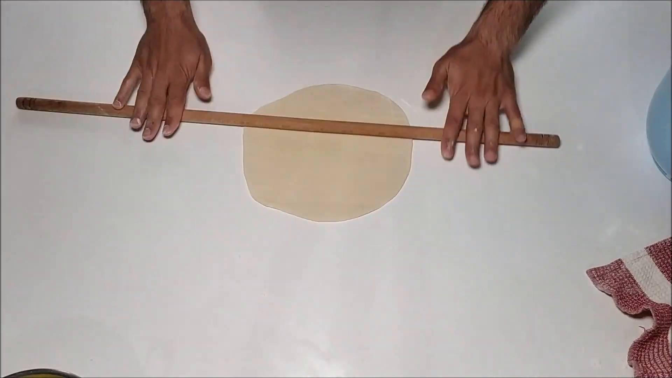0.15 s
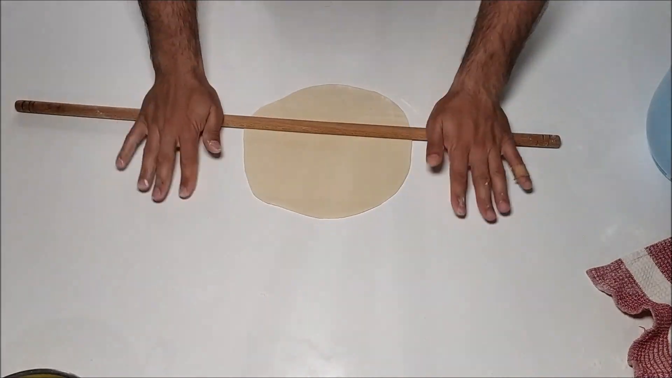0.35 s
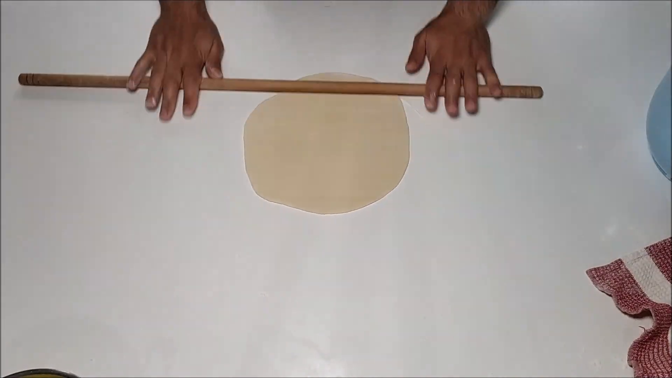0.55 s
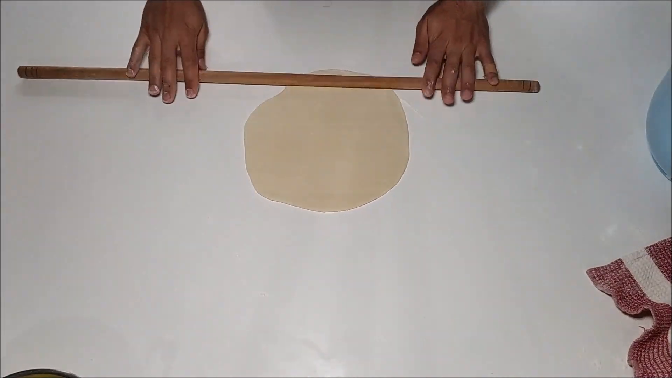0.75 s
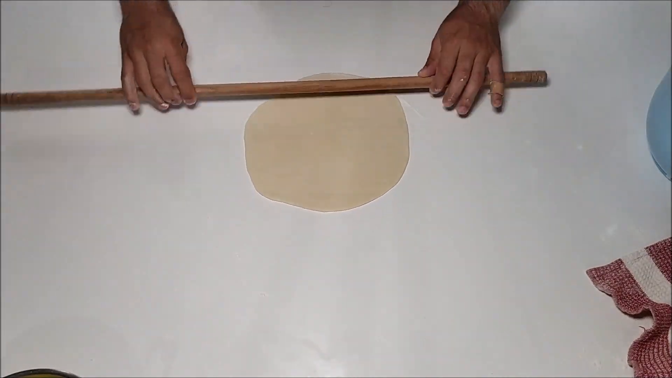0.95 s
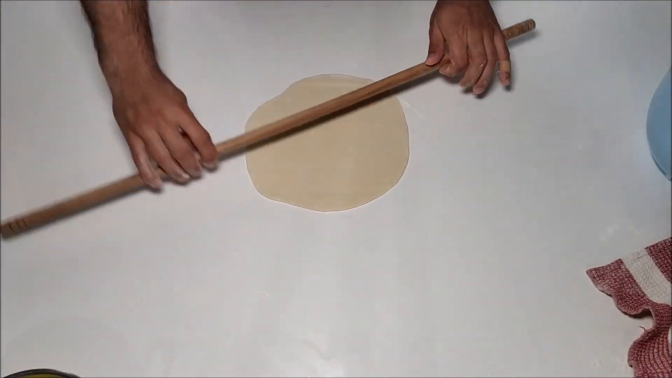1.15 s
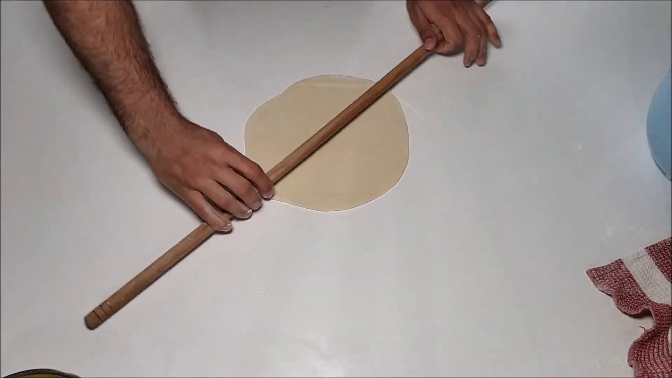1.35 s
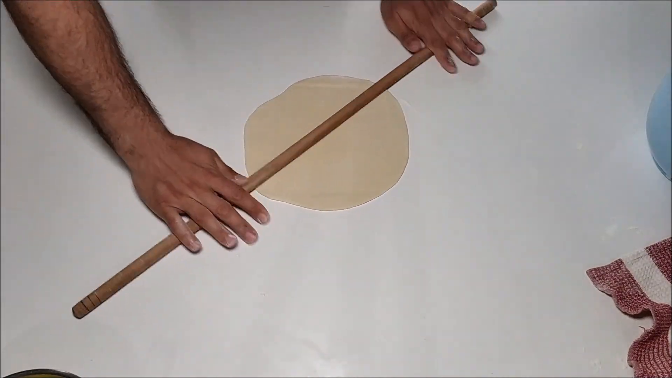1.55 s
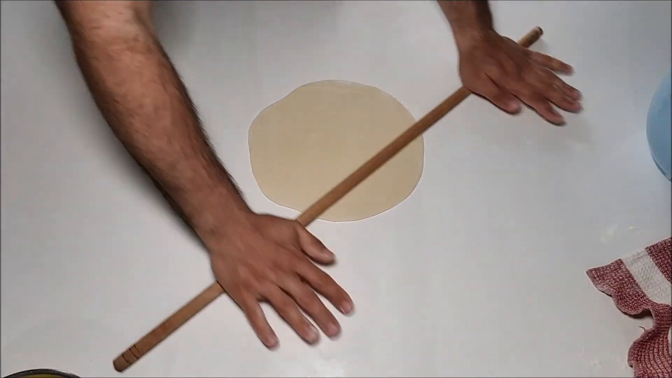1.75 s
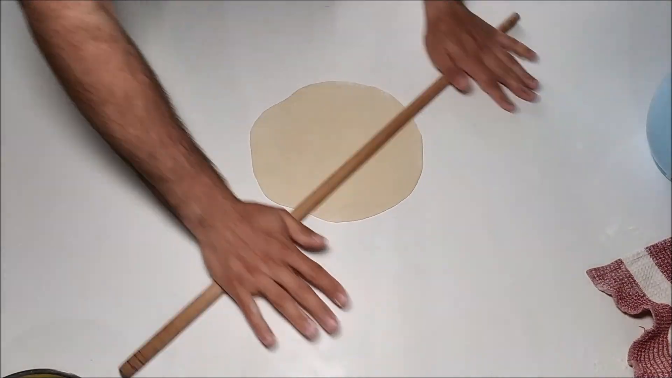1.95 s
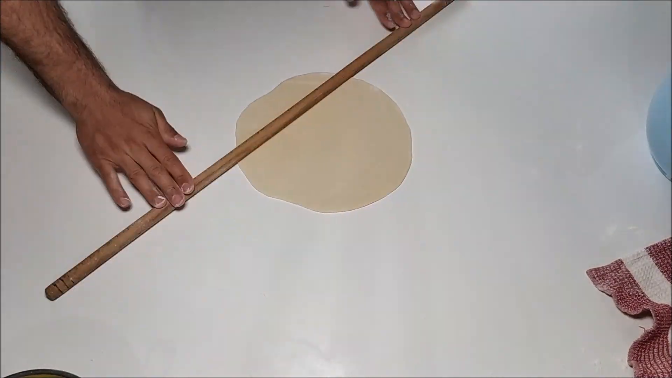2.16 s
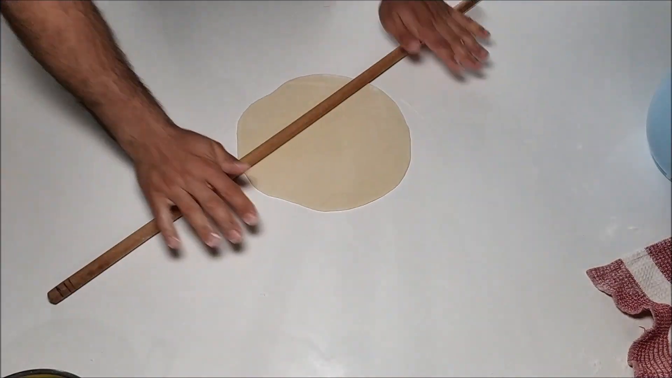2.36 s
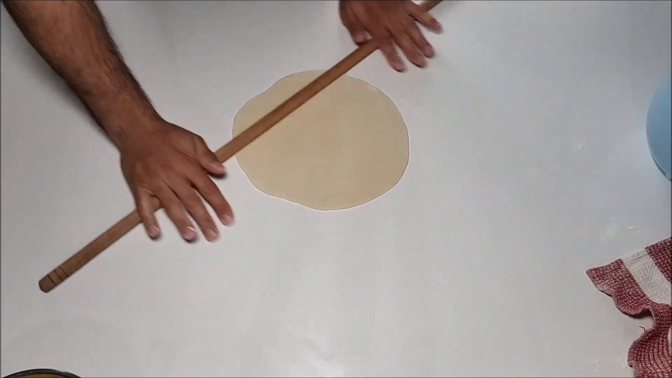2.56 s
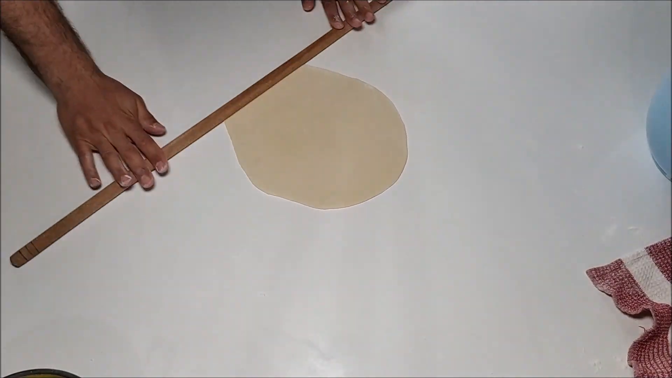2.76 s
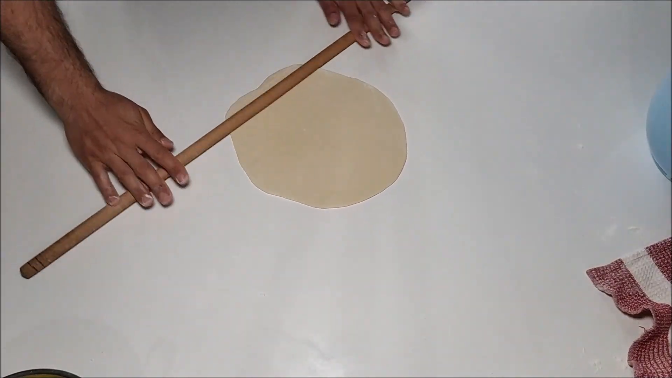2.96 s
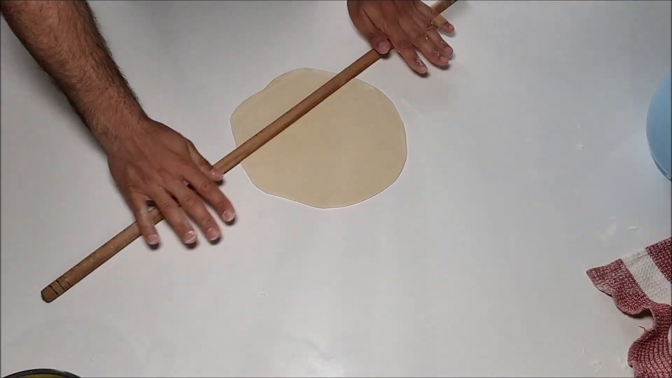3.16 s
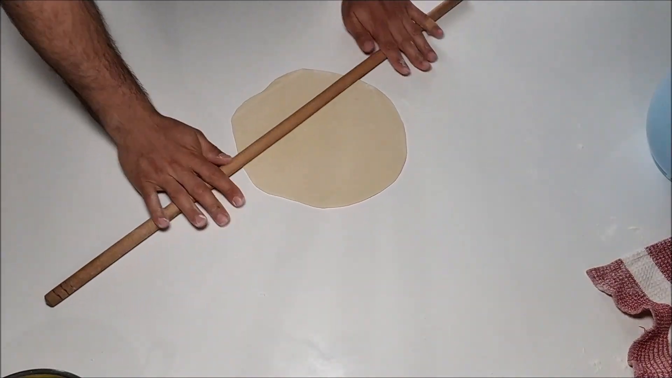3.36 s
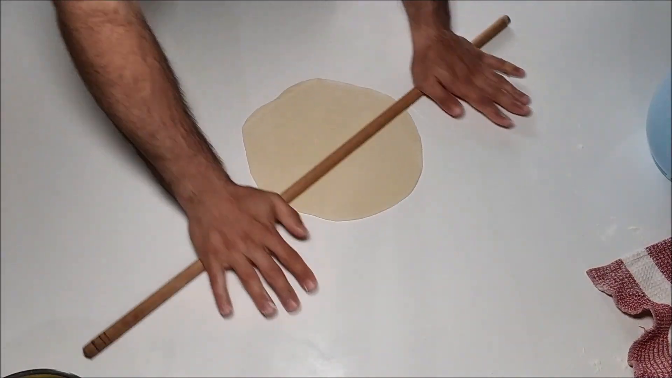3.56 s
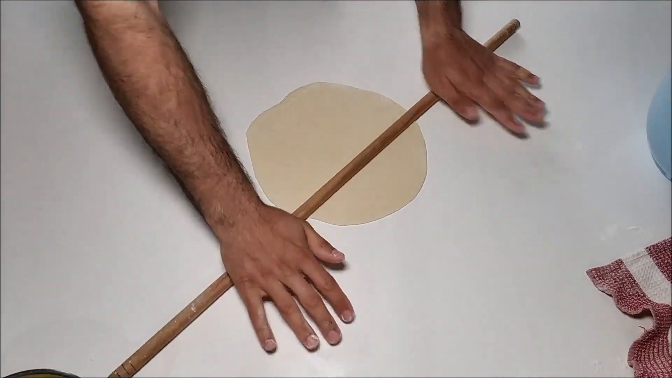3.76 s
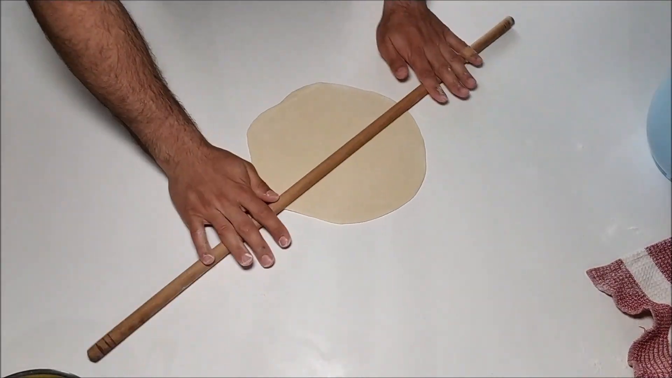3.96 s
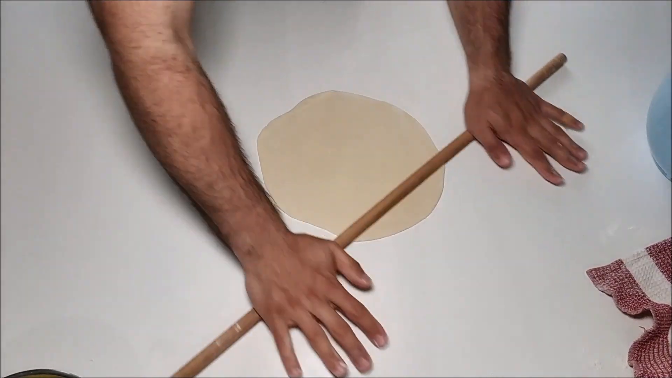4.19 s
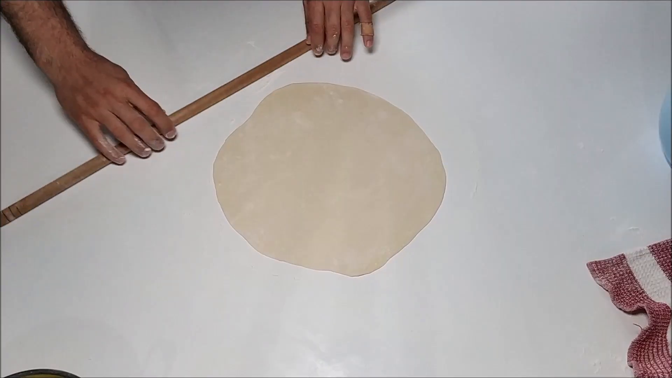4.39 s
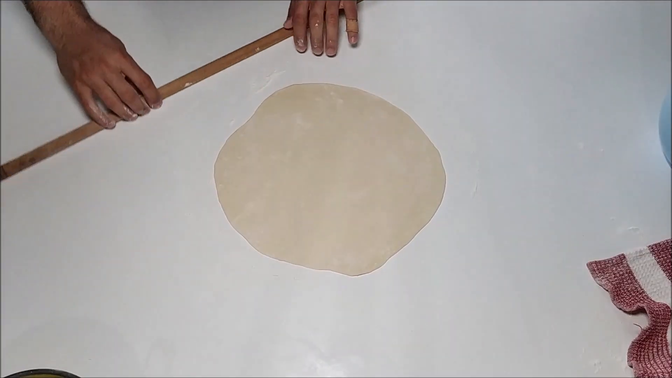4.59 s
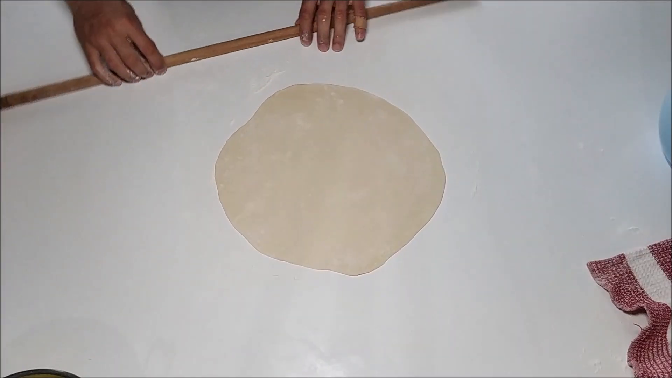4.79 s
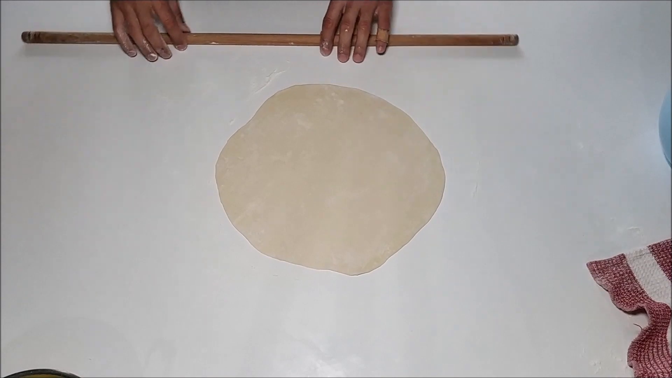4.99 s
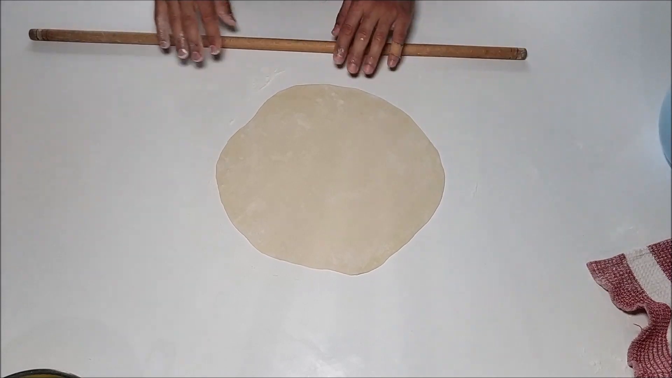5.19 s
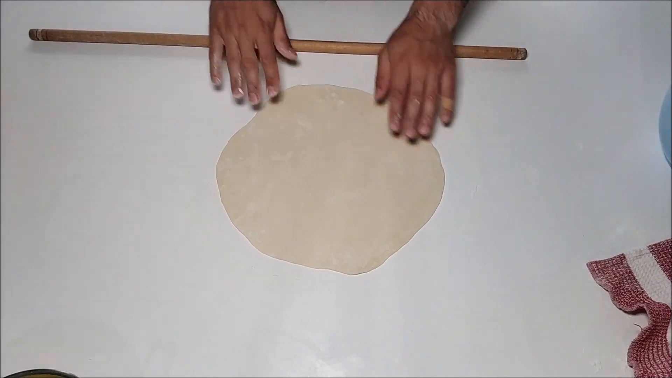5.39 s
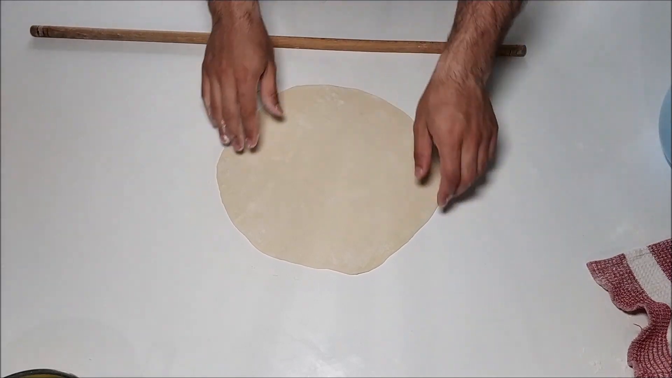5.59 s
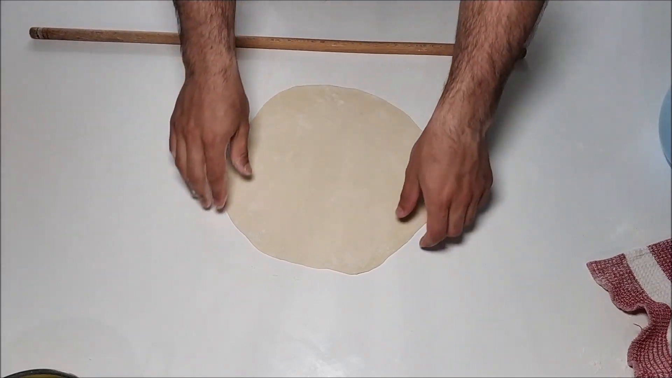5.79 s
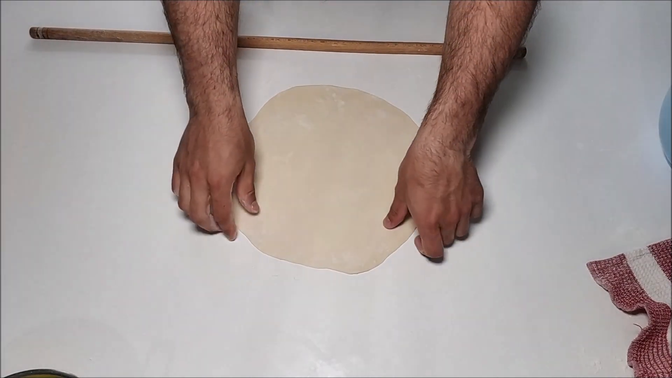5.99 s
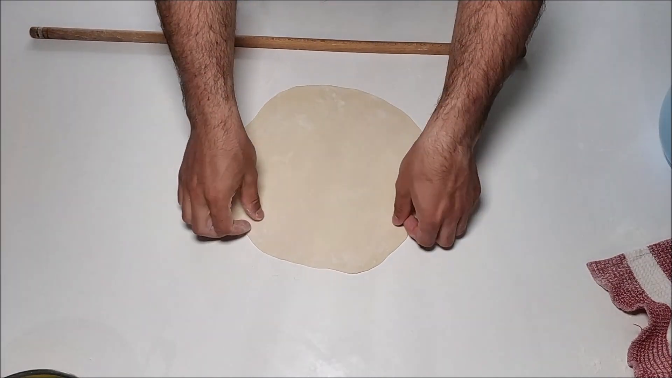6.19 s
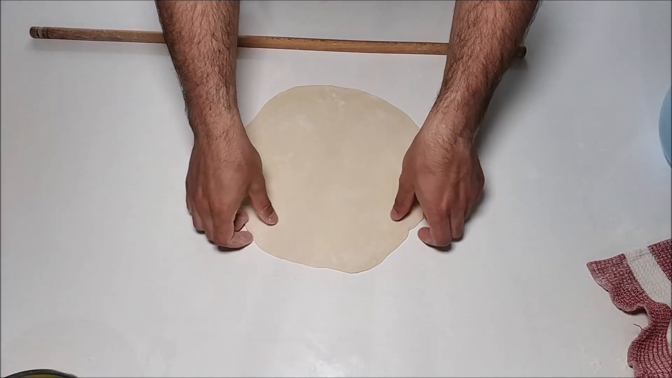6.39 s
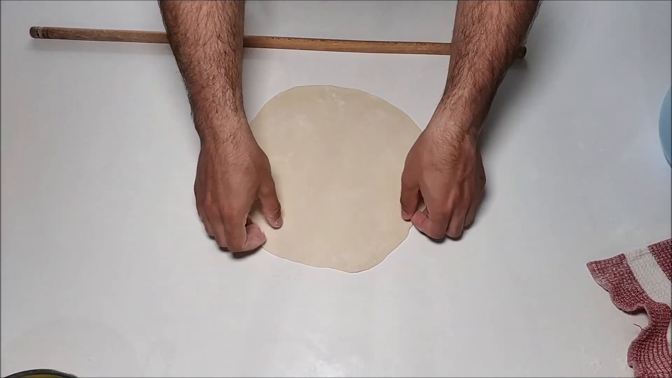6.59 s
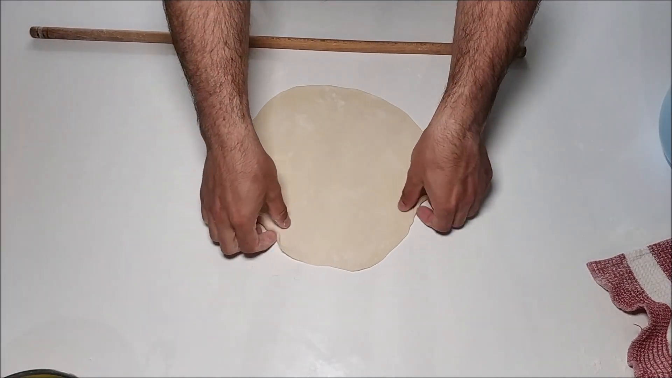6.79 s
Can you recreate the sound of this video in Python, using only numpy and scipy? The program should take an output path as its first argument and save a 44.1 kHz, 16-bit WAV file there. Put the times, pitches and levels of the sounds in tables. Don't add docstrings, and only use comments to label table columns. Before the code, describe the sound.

Sharp wooden knocks with quick rattling bounces, low rolling and dry hand swishes over dough on a counter, ending in near-quiet with faint soft thumps.

```python
import sys
import numpy as np
from scipy import signal
from scipy.fft import rfft, irfft
from scipy.io import wavfile
from scipy.ndimage import uniform_filter1d, minimum_filter1d

SR = 44100
rng = np.random.default_rng(int(sys.argv[2]) if len(sys.argv) > 2 else 0)


def output_pcm(signal):
    pcm = np.clip(np.atleast_2d(signal).T, -1, 1) * 32767
    wavfile.write(sys.argv[1], SR, np.round(pcm).astype(np.int16))


def volts_from_decibels(level):
    exponent = np.asarray(level, float) / 20
    return 10 ** exponent


N = 301644
SCENE_CHANGE_S = 4.4051


def evened(x):
    return x / np.sqrt(np.mean(x ** 2) + 1e-20)


def read(points, hz):
    f, value = np.transpose(points)
    return np.interp(np.log(hz + 1), np.log(f + 1), value)


def add(mix, s, sound):
    part = mix[round(s * SR):][:len(sound)]
    part += sound[:len(part)]


def causal(gain_db, size=512):
    mirrored_db = np.r_[gain_db, gain_db[-2:0:-1]]
    log_gain = np.log(volts_from_decibels(np.maximum(mirrored_db, -100)))
    return np.fft.ifft(np.exp(log_gain - 1j * signal.hilbert(log_gain).imag)).real[:size]


def ring(modes, spread_db, detune):
    hz, db, t60 = np.transpose(modes)[:, :, None]
    t = np.arange(SR // 4) / SR
    level = volts_from_decibels(db + spread_db[:, None] - 60 * t / t60)
    sound = (level * np.sin(2 * np.pi * hz * detune[:, None] * t)).sum(axis=0)
    return sound / np.linalg.norm(sound)


def noise(spectrum, patchy_db, flicker_db, size=512):
    hop, hz = size // 4, np.fft.rfftfreq(size, 1 / SR)
    a, b, patches = rng.standard_normal((N // hop + 5, len(hz), 3)).T
    flicker = evened(uniform_filter1d(patches[0], size=3))
    patches = uniform_filter1d(patches, size=6, axis=0)
    patches = evened(uniform_filter1d(patches, size=16, axis=1))
    level_db = read(spectrum, hz)[:, None] + patchy_db * patches + flicker_db * flicker
    z = (a + 1j * b) * volts_from_decibels(level_db)
    return evened(signal.istft(z, nperseg=size, noverlap=size - hop)[1][:N])


# t/s, peak/dB, free-end f/Hz, tilt/(dB/oct), room/dB
BLOWS = [(.8918, -24, 3060, 0, 0), (1.1163, -44, 4200, 3.5, 1), (1.4731, -16, 4150, -.5, 2.5),
         (1.5264, -13.5, 2520, -.5, -1.5), (2.0442, -46, 1000, -8, 7), (2.1456, -15, 3870, -2, -6),
         (2.5269, -12.5, 3400, -1, -1.5), (2.564, -19.5, 2290, -3, 0), (3.38, -4.5, 4970, 2.5, .5),
         (3.6822, -34, 1720, -6.5, 1), (3.9696, -2.5, 3540, 1.5, -2.5), (4.4053, -21, 1700, -5, 0),
         (4.956, -51, 1140, -4, 8)]
# t/s, peak/dB, free-end f/Hz, tilt/(dB/oct)
BOUNCES = [(.8944, -23, 1540, -3), (.9067, -19.5, 1135, -2.5), (1.4745, -11.5, 2520, -.5),
           (1.479, -15, 3060, -2), (1.4855, -16, 1850, -1), (1.5298, -14.5, 3720, -2.5),
           (1.5391, -16, 3060, -1.5), (1.5433, -17, 1800, -1.5), (2.1493, -20, 817, -3),
           (2.1536, -21.5, 1850, -4), (2.1645, -24, 2260, -3.5), (2.5286, -14, 1900, -2.5),
           (2.5311, -16, 3000, -1.5), (2.575, -26, 1555, -3), (3.3902, -8, 3400, -.5),
           (3.3923, -9.5, 2100, 0), (3.985, -19, 1583, -2), (4.419, -19, 3760, -1), (4.4304, -18, 2330, -3),
           (4.4446, -21, 1790, -2.5)]
BOUNCE_ROOM_DB = -1.94


def all_clacks():
    return sorted(BLOWS + [row + (BOUNCE_ROOM_DB,) for row in BOUNCES])


# f/Hz, level/dB
CLICK = [(150, -38.5), (300, -17), (800, -17), (1700, -6.5), (3060, -3), (3780, -0.5), (5340, -5.5),
         (7450, -16.5), (9060, -13.5), (9770, -18.5), (11000, -48), (14300, -57.5), (22000, -100)]
# f/Hz, level/dB, t60/s
ROD = [(800, -5, .04), (1135, 0, .04), (1540, 1, .045), (1870, 0, .035), (2040, -3, .035), (2330, -2, .035),
       (2630, -2, .03), (3060, 0, .045), (3500, -3, .03), (3800, -6, .025), (4180, -5, .03),
       (4600, -9, .025), (5000, -9, .025), (5280, -11, .025)]
# f/Hz, level/dB, t60/s
COUNTER = [(159, -8, 0.13), (237, 2.5, 0.074), (336, -1.5, 0.025), (387, 7, 0.069), (564, -15, 0.076)]
RING_DB, RING_SLOPE, SOFT_DB = 0.7, 0.61, -25


def clacks():
    mix, tails, hz = np.zeros(N), kitchen_tails(count=7), np.fft.rfftfreq(2048, 1 / SR)
    rows = all_clacks()
    chance = rng.standard_normal((len(rows), 2, len(ROD + COUNTER) + 1))
    grit, t = rng.standard_normal((len(rows), 2, 800)), np.arange(800) / SR
    for k, (s, peak_db, end_hz, tilt_db, room_db) in enumerate(rows):
        ring_db = RING_DB - RING_SLOPE * max(peak_db - SOFT_DB, 0)
        spread_db, detune = 2.2 * chance[k, 0], 1 + 0.006 * chance[k, 1]

        tick = causal(read(CLICK, hz) + tilt_db * np.log2(np.maximum(hz, 500) / 2500))
        tick /= abs(tick).max()
        chatter = grit[k, 0] ** 3 * np.exp(-t / 0.0063)
        chatter /= np.linalg.norm(chatter)
        blow = signal.oaconvolve(tick, volts_from_decibels(ring_db + 5.5) * chatter)
        add(blow, 0, tick)

        modes = ROD + [(end_hz, 8.5, 0.032)]
        split = len(modes)
        wood = ring(modes, spread_db[:split], detune[:split])
        rod = signal.oaconvolve(blow, volts_from_decibels(0.6 * ring_db - 5) * wood)
        thud = ring(COUNTER, spread_db[split:], detune[split:])
        thud *= volts_from_decibels(-6.5 - 1.35 * tilt_db)
        dry = rod[:len(thud)] + thud
        add(dry, 0, blow)

        add(mix, s, volts_from_decibels(peak_db) * dry)
        add(mix, s, volts_from_decibels(peak_db + room_db) * signal.oaconvolve(dry, tails[k % len(tails)]))
        if s < SCENE_CHANGE_S:
            lead_in = grit[k, 1] * volts_from_decibels(-31 - 60 * t[::-1] / 0.025)
            add(mix, s - len(t) / SR, volts_from_decibels(peak_db) * signal.oaconvolve(lead_in, tick)[:len(t)])
    return mix


# t/s, level/dB, f/Hz, t60/s
THUMPS = [
    (1.5266, -9.5, 413, .08),
    (2.15, -16.5, 138, 0.14),
    (2.5268, -12, 246, .1),
    (2.69, -22.5, 150, .2),
    (4.4054, -2.5, 352, 0.069),
    (4.59, -18, 300, 0.084),
    (5.209, -26.5, 300, .05),
    (6.121, -28, 205, 0.39),
    (6.385, -28, 208, .15),
    (6.77, -24.5, 209, 0.34),
]
THUMP_RISE_S, THUMP_ROOM_DB = 0.0033, 2


def thumps():
    mix, tail, t = np.zeros(N), kitchen_tails(count=1)[0], np.arange(SR // 4) / SR
    rise = 1 - np.exp(-t / THUMP_RISE_S)
    for s, db, hz, t60 in THUMPS:
        modes = COUNTER + [(hz, 7, t60)]
        dry = volts_from_decibels(db) * rise * ring(modes, np.zeros(len(modes)), np.ones(len(modes)))
        add(mix, s, dry)
        add(mix, s, volts_from_decibels(THUMP_ROOM_DB) * signal.oaconvolve(dry, tail))
    return mix


# f/Hz, t60/s
KITCHEN = [(200, 0.6), (500, 0.24), (1100, 0.38), (2700, 0.37), (5000, 0.22), (8000, 0.25)]


def kitchen_tails(count):
    taps = np.zeros((count, SR))
    slots = np.arange(60, SR - 20, 16)
    at = slots + rng.integers(0, 16, (count, len(slots)))
    np.put_along_axis(taps, at, rng.choice([-1., 1.], at.shape), axis=1)
    hz, t, z = signal.stft(taps, SR, nperseg=256)
    decay = volts_from_decibels(-60 * t / read(KITCHEN, hz)[:, None])
    tails = signal.istft(z * decay, SR, nperseg=256)[1]
    tails *= 1 - np.exp(-np.arange(tails.shape[1]) / SR / 0.0021)
    return tails / np.linalg.norm(tails, axis=1)[:, None]


# middle t/s, length/s, speed as hiss level/dB, weight as rumble level/dB
STROKES = [(0.147, 0.22, -51, -51), (.19, 0.15, -64, -44), (0.275, .18, -52, -52.5),
           (0.558, 0.15, -54.5, -68), (0.678, .18, -44, -48), (0.997, 0.089, -53, -61),
           (1.112, 0.11, -52.5, -73), (1.207, 0.082, -57.5, -80), (1.36, 0.18, -70, -63),
           (1.58, 0.27, -53, -57), (1.752, 0.22, -55.5, -53.5), (1.873, 0.18, -53.5, -51),
           (2.103, 0.14, -51, -52.5), (2.225, 0.29, -50.5, -47.5), (2.633, 0.056, -41.5, -49),
           (2.716, 0.19, -36, -51), (3.065, 0.19, -62.5, -64), (3.187, 0.11, -54, -61.5),
           (3.546, 0.24, -55, -49.5), (3.691, 0.24, -52.5, -54), (3.842, 0.18, -62.5, -67.5),
           (4.08, 0.24, -53.5, -57.5), (4.253, 0.32, -52, -51.5), (4.505, 0.14, -85, -43.5),
           (4.648, 0.16, -57, -51), (4.816, 0.36, -55, -67), (5.013, 0.21, -61, -62.5)]
ENDS_DB, FLATNESS, LEAN_LEAD = -12, 1.55, 0.088


def arches(level_db, lead):
    middle, length = np.transpose(STROKES)[:2, :, None]
    t = np.arange(0, N + 64, 64) / SR
    away = abs(t - middle + lead * length) / (length / 2)
    arch_db = level_db[:, None] + ENDS_DB * np.minimum(away, 4) ** FLATNESS
    power = (volts_from_decibels(arch_db) ** 2).sum(axis=0)
    return np.interp(np.arange(N) / SR, t, np.sqrt(power))


# f/Hz, level/dB
HISS = [(1470, -24.5), (2500, -16), (2640, -8), (2850, -18.5), (3770, -11.5), (5960, -8), (6580, -12),
        (8810, 0), (9980, -4.5), (11000, -33.5), (14300, -68), (22000, -120)]
# f/Hz, level/dB
RUMBLE = [(41, -75), (70, -35), (116, -5), (172, 1), (237, -2), (312, 0), (556, -10.5), (639, -10.5),
          (900, -16.5), (1170, -36), (1980, -120)]
# f/Hz, level/dB
SCRAPE = [(200, -47), (400, -8), (700, -0.5), (1100, 2.5), (1700, 5.5), (2600, 2), (4500, -2), (7000, -13),
          (9000, -60.5), (15000, -100)]
SCRAPE_SPEED_SHARE, SCRAPE_DB = 0.25, -3


def strokes():
    speed_db, weight_db = np.transpose(STROKES)[2:]
    hiss, rumble = arches(speed_db, 0), arches(weight_db, LEAN_LEAD)
    blend_db = SCRAPE_SPEED_SHARE * speed_db + (1 - SCRAPE_SPEED_SHARE) * weight_db + SCRAPE_DB
    scrape = np.hypot(arches(blend_db, LEAN_LEAD / 2), skids())
    mix = hiss * noise(HISS, 1.1, 1.7, size=256)
    mix += rumble * noise(RUMBLE, 0.53, 1.2, size=1024)
    mix += scrape * noise(SCRAPE, 2.96, 0.43)
    return mix


SKID_DB, SKID_RISE_S, SKID_FALL_DB_PER_S = -23, 0.031, 140.5


def skids():
    kicks, t = np.zeros(N), np.arange(SR // 2) / SR
    for s, peak_db, *_ in all_clacks():
        if s < SCENE_CHANGE_S:
            add(kicks, s, np.array([volts_from_decibels(2 * peak_db)]))
    shape = (1 - np.exp(-t / SKID_RISE_S)) ** 2 * volts_from_decibels(SKID_DB - SKID_FALL_DB_PER_S * t)
    return np.sqrt(abs(signal.oaconvolve(kicks, shape ** 2)[:N]))


# t/s, level/dB
HUSH_LEVEL = [(0, -63.5), (.9, -61), (2.0, -64.5), (2.45, -67.5), (2.9, -64), (3.3, -65.5), (3.9, -80),
              (4.55, -70), (4.8, -57), (5.3, -61), (5.6, -59.5), (6.84, -58.5)]
# f/Hz, level/dB
HUSH = [(35, -91), (60, -53), (106, -33), (129, -10.5), (167, -4.5), (204, -5), (359, -6.5), (383, -6.5),
        (498, -9.5), (753, -12.5), (1090, -11), (7120, -22.5), (9260, -18), (11000, -43.5), (14300, -76),
        (22000, -120)]
# f/Hz, width/Hz, level/dB
HUM = [(214.3, 3.5, -69), (542, 22, -73), (1190, 31, -90)]


def hush():
    t = np.arange(N) / SR
    s, db = np.transpose(HUSH_LEVEL)
    mix = noise(HUSH, 1.3, 0.35, size=1024)
    for hz, width_hz, hum_db in HUM:
        pole = np.exp(-np.pi * width_hz / SR)
        wander = signal.lfilter([1], [1, -pole], rng.standard_normal((2, N)))
        turn = 2 * np.pi * hz * t
        hum = wander[0] * np.cos(turn) + wander[1] * np.sin(turn)
        mix += volts_from_decibels(hum_db + 59) * evened(hum)
    return volts_from_decibels(np.interp(t, s, db)) * mix


def coarsen(x, power=0.48):
    def local_rms(z):
        return np.sqrt(uniform_filter1d(abs(z) ** 2, size=24, axis=0)) + 1e-12

    z = signal.stft(x, nperseg=2048, noverlap=1024)[2]
    local = local_rms(z)
    lifted = z * (abs(z) / local) ** power
    lifted *= local / local_rms(lifted)
    return signal.istft(lifted, nperseg=2048, noverlap=1024)[1][:N]


def scene():
    return (clacks() + thumps() + coarsen(strokes() + hush()))[None]


# t/s, lowest f/Hz, depth/0-1
STARVED = [(.067, 1000, .9), (.556, 300, .85), (.599, 300, .92), (.833, 300, .9), (.943, 5600, .9),
           (.993, 3000, .7), (1.088, 300, .9), (1.197, 300, .92), (1.303, 3000, .8), (1.515, 5600, .9),
           (2.244, 3000, .85), (2.625, 300, .88), (2.733, 1000, .92), (3.213, 300, 1), (3.331, 4000, .85),
           (4.077, 4000, .88), (5.377, 3000, .85), (5.507, 2000, .88), (6.039, 300, .88),
           (6.722, 3000, .85)]


def starve(x):
    out, window, hz = x.copy(), signal.windows.hann(2048), np.fft.rfftfreq(2048, 1 / SR)
    spared = rng.random((len(STARVED), 40)) < 0.3
    for (s, low_hz, depth), spare in zip(STARVED, spared):
        z = rfft(window * x[round(s * SR) - 1024:][:2048])
        local_top = -minimum_filter1d(-abs(z), size=27)
        strong = 1. * (abs(z) == local_top)
        weak = uniform_filter1d(strong, size=3) == 0
        lost = weak * (hz > low_hz) * ~spare[(hz / 700).astype(int)]
        add(out, s - 1024 / SR, -depth * irfft(z * lost))
    return out


def band_limit(x):
    return signal.sosfilt(signal.butter(12, 11170, fs=SR, output="sos"), x)


def record(dry):
    low_cut = signal.cheby2(4, 32, 80, "high", fs=SR, output="sos")
    edge = signal.firwin(255, 11050, window=("kaiser", 9), fs=SR)
    picked = signal.oaconvolve(signal.sosfilt(low_cut, dry[0]), edge, "same")
    picked = starve(picked)
    jump = -volts_from_decibels(-27) * np.exp(-np.arange(600) / SR / 0.00016)
    add(picked, SCENE_CHANGE_S, jump)
    return band_limit(picked[None])


dry = scene()
out = record(dry)
output_pcm(out)
```